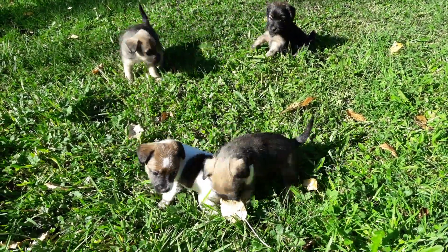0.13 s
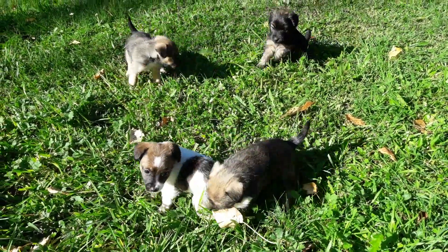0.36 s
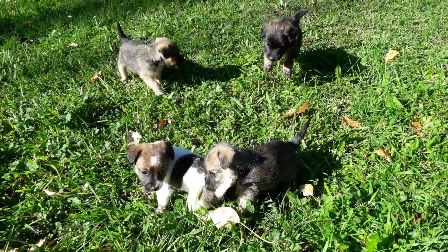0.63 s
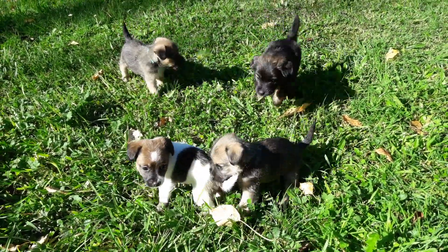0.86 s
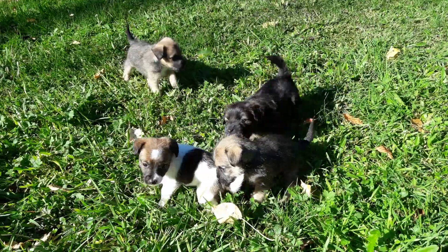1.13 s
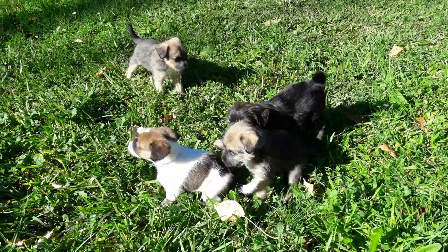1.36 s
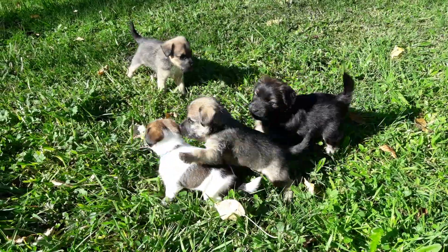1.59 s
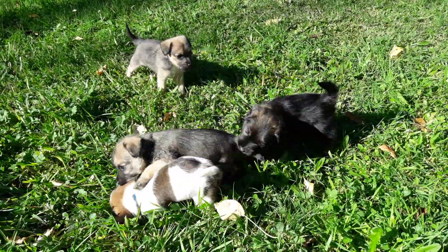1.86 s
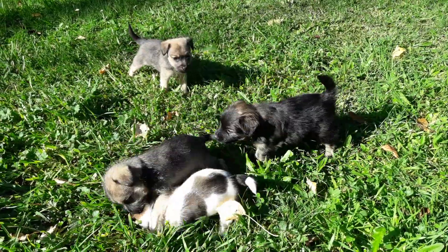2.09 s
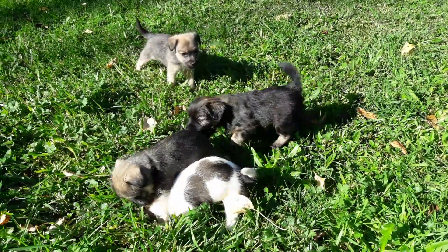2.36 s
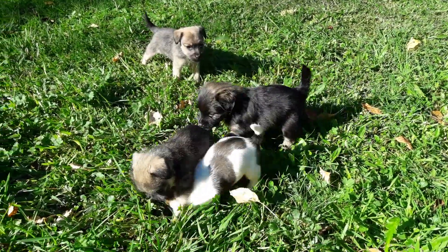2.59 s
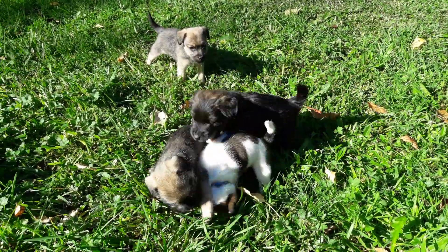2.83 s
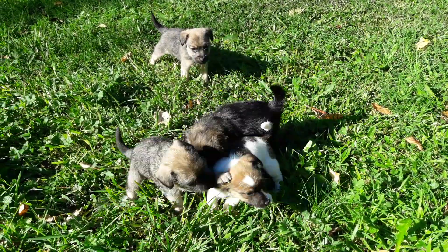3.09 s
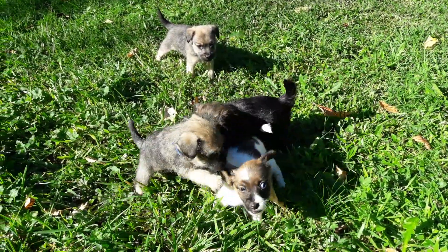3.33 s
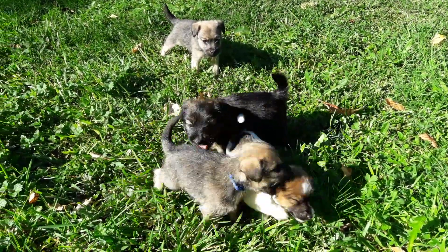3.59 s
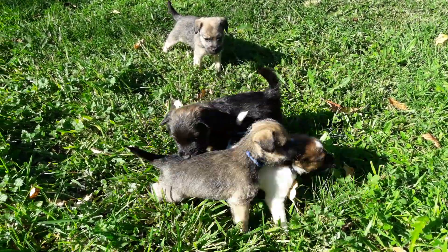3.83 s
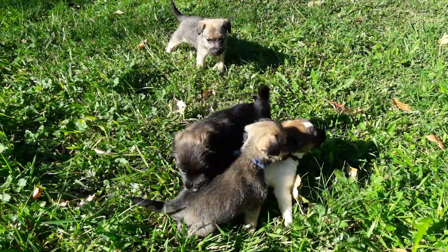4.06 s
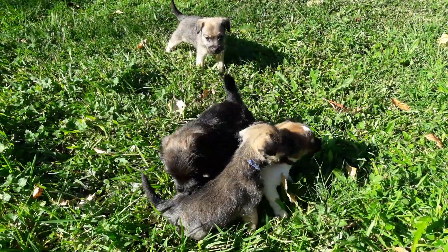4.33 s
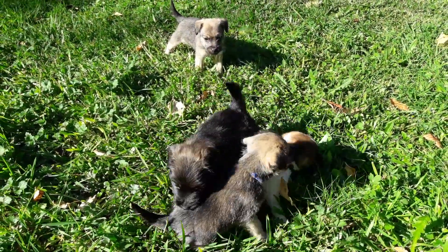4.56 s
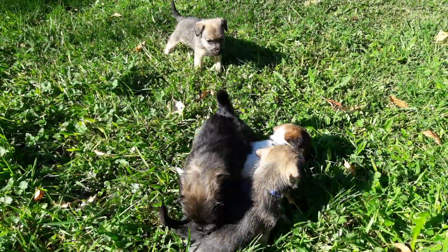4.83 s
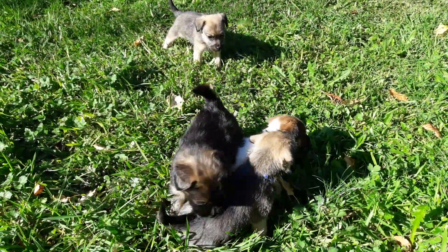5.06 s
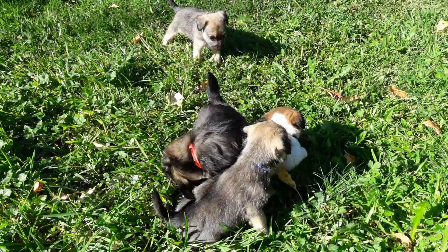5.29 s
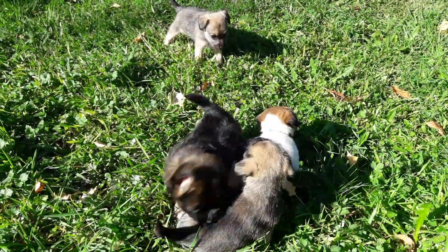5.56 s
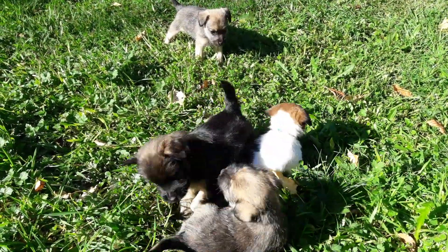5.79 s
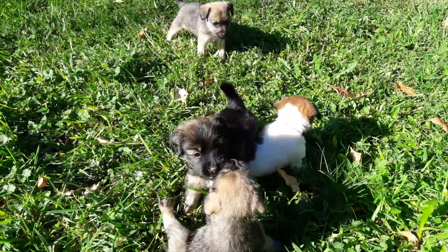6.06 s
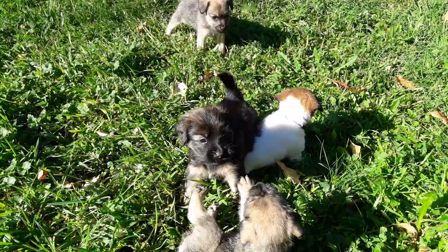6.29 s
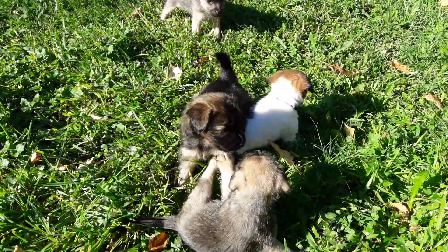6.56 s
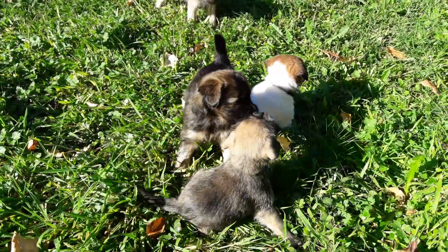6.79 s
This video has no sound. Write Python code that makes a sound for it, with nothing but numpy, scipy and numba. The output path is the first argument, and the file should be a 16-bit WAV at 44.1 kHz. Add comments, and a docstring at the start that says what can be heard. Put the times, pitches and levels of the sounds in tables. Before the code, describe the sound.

Small puppies wrestle on grass close to the microphone. Quiet hiss and sparse ticks come first, then paws scuff crisply through blades and dry leaves. A short throbbing growl sounds after two seconds, tiny faint grunts follow, a weak low growl comes past four, and two louder hoarse growls come near six. A faint sniff ends it. A low breeze rumbles beneath, almost centred.

```python
"""On a lawn, puppies wrestle a step away: hoarse throbbing play-growls, short grunts and a faint late sniff.
Each voice is a clear fundamental plus rough puffs and breath ringing three resonances of throat and mouth.
Paws and fur crackle through grass and dry leaves as filtered bursts of clicks, and single stalks snap
as tiny rings inside crunching noise. Behind lie an even microphone hiss and the low rumble of a breeze."""
import sys
import numpy as np
from scipy import signal
from scipy.fft import rfft, irfft
from scipy.io import wavfile
from scipy.ndimage import uniform_filter1d
from numba import njit

SR = 44100
rng = np.random.default_rng(int(sys.argv[2]) if len(sys.argv) > 2 else 0)


def generate_wav(sig):
    """Save sig (samples, or channels by samples) to the path in sys.argv[1] as 16-bit PCM at SR."""
    pcm = np.round(np.clip(np.atleast_2d(sig).T, -1, 1) * 32767).astype(np.int16)
    wavfile.write(sys.argv[1], SR, pcm)


def invert_db(level):
    """Linear amplitude ratio for a level in decibels (20 dB per decade), elementwise."""
    return 10 ** (np.asarray(level, dtype=float) / 20)


N = 304936
TIME = np.arange(N) / SR


def unit(x):
    """Scale to rms 1."""
    return x / np.sqrt(np.mean(x ** 2))


def shape(x, points):
    """Filter by (Hz, dB) points; 120 dB down outside them."""
    hz, db = np.transpose(points)
    f = np.maximum(np.arange(len(x) // 2 + 1) * SR / len(x), 1)
    gain_db = np.interp(np.log(f), np.log(hz), db, -120, -120)
    return irfft(rfft(x) * invert_db(gain_db), len(x))


def walk(rate, size=N):
    """Smooth chance that changes about rate times a second, spread 1."""
    k = max(int(SR / rate), 1)
    smooth = uniform_filter1d(rng.standard_normal(size), k)
    return unit(uniform_filter1d(smooth, k))


def swell(s, db, rise_s, fall_s):
    """Power of an event that grows to its peak at s and dies away."""
    before = (s - TIME) / max(rise_s, 1e-3)
    after = (TIME - s) / max(fall_s, 1e-3)
    return invert_db(db) ** 2 * np.exp(-2 * np.maximum(before, after))


@njit
def svf(x, hz, width):
    """State-variable band-pass whose centre can move; gain 1 at the centre."""
    y, b, l = np.empty(len(x)), 0., 0.
    for i in range(len(x)):
        g, k = np.tan(np.pi * hz[i] / SR), width / hz[i]
        v = (b + g * (x[i] - l)) / (1 + g * (g + k))
        b, l, y[i] = 2 * v - b, l + 2 * g * v, k * v
    return y


def choke(t, flaps, width_s):
    """Depth in dB of the throat flaps over time: one smooth bump a flap."""
    return sum(db * np.exp(-((t - s) / width_s) ** 2) for s, db in zip(*flaps))


# a side pocket swallows a band just under the upper resonance and moves with it
POCKET_RATIO, POCKET_WIDTH_HZ = 0.766, 120


def voice(t, flaps, hz, low_db, throat_db, mouth_db, upper_db, upper_hz,
          throat_hz, mouth_hz, mouth_width_hz, slide, hoarse):
    """A clear fundamental; uneven puffs of the vocal folds and their air ring three resonances."""
    size = len(t)
    dip_db = choke(t, flaps, 0.0064)
    # the pitch slides down between flaps, sags around each and trembles from cycle to cycle
    flap_count = np.interp(t, flaps[0], np.arange(len(flaps[0])))
    between = uniform_filter1d(flap_count % 1, size=400)
    sag = 1 - invert_db(-choke(t + 0.00096, flaps, .011))
    tremble = 0.048 * hoarse * walk(295, size=size)
    hz = hz * (1.06 - 0.2 * sag - slide * (between - .5) + tremble)
    phase = 2 * np.pi * np.cumsum(hz) / SR
    fundamental_db = low_db + 2.5 - dip_db + 6 * hoarse * walk(123, size=size)
    out = -np.sqrt(2) * invert_db(fundamental_db) * np.sin(phase)

    harmonics = sum(np.cos(k * phase) for k in range(2, 14))
    puffs = harmonics * invert_db(5 * hoarse * walk(260, size=size))
    breath = rng.standard_normal(size) * (1 + .5 * np.cos(phase))
    source = unit(puffs) + 2.4 * hoarse * unit(breath)
    # level, centre, width, edge above which side pockets of the throat swallow the sound
    resonances = ((throat_db - 0.024 * dip_db, throat_hz, 360, 1100),
                  (mouth_db - 0.025 * dip_db, mouth_hz, mouth_width_hz, 1550),
                  (upper_db - 0.1 * dip_db, upper_hz, 680, 2300))
    for db, centre_hz, width_hz, top_hz in resonances:
        ring = signal.sosfilt(signal.butter(12, top_hz, fs=SR, output="sos"), source)
        for _ in range(3):  # steep flanks leave dark valleys between the resonances
            ring = svf(ring, centre_hz + 0 * t, 1. * width_hz)
        out -= invert_db(db) * unit(ring)
    return out - svf(out, POCKET_RATIO * upper_hz + 0 * t, 1. * POCKET_WIDTH_HZ)


# The growls, one list a call. Each row: time in seconds, base pitch in Hz, effort in dB,
# mouth opening from 0 to 1.
CALLS = [
    [(2.228, 289.2, -61.5, 0.44), (2.311, 283, -40.5, 0.36), (2.399, 240.5, -45, 0.36),
     (2.468, 225.3, -56, 0.23), (2.5, 221, -78.5, 0.22)],
    [(4.185, 250, -66, 0.43), (4.239, 248.4, -54.5, 0.44), (4.459, 198.8, -65.5, 0.26),
     (4.509, 186.8, -72, 0.02), (4.53, 190, -72, .1)],
    [(5.445, 294.4, -62, 0.17), (5.529, 272.5, -49.5, 0.08), (5.649, 337.4, -38.5, 0.61),
     (5.715, 286.5, -41, 0.63), (5.787, 309, -41.5, 0.76), (5.839, 292.5, -43.5, .1),
     (5.856, 276, -71.5, 0.67)],
    [(6.125, 330.4, -55, 0.64), (6.165, 343.6, -35, 0.09), (6.249, 289, -46.5, 0.87),
     (6.359, 300.2, -45.5, 0.9), (6.417, 271, -47, 0.91), (6.485, 265.1, -50, 0.49),
     (6.611, 272.6, -49.5, 0.04), (6.651, 256, -51, .05), (6.69, 258, -65, 0)],
]
# The caller's throat and mouth. Each row: throat resonance in Hz, mouth resonance in Hz, mouth width in Hz,
# pitch slide from flap to flap as a share.
CALLER_THROATS = [(604, 829, 380, 0.1463), (370.4, 886, 367, 0.2), (643, 896, 660, 0.035),
                  (576, 800, 640, 0.031)]
# How rough each caller sounds. Each entry: share of disorder, 0 to 1.
CALLER_HOARSENESS = [.75, .45, .52, .52]
# How each caller's sound is divided, against its effort. Each row: base level of the fundamental in dB,
# effort up to which it stays relaxed in dB, mouth level when shut in dB, mouth gain when wide open in dB,
# upper resonance level when shut in dB.
CALLER_BALANCES = [(-19, -43, -3.5, 2, -42), (2.5, -56, -5, 8, -18.5), (6, -50.5, -1.3, -1.5, -15.5),
                   (2, -46.5, -1, 5, -14.5)]
# The upper resonance arches through a call. Each row: start in Hz, middle in Hz, end in Hz.
UPPER_ARCHES = [(2000, 2100, 1900), (1680, 1830, 1950), (2340, 1990, 2330), (1650, 2094, 1950)]
# A slack fold in the throat flaps and briefly chokes the voice. Each row: nominal first flap in seconds,
# period in seconds, depth in dB before easing and scatter.
THROAT_FLAPS = [(2.265, 0.038, 16), (4.222, .0372, 20), (5.505, .0415, 14), (6.143, 0.042, 14.5)]
FLAP_JITTER_S, FLAP_SCATTER_DB = 0.0031, 3
FLAP_EASE = .45  # share of the depth lost with the mouth wide open
OPEN_UPPER_DB = 14.5  # gain of the upper resonance from shut to wide open
STRAIN = 1.22  # dB that the fundamental loses for each dB of effort above the relaxed one
VOICING_S, VOICING_DB = 0.059, 20  # a call starts breathy: the fundamental climbs by so much in this time


def growls():
    """Effort and mouth opening set the parts of a growl, while a flapping fold makes it throb."""
    out = np.zeros(N)
    callers = zip(CALLS, CALLER_THROATS, CALLER_HOARSENESS, CALLER_BALANCES, UPPER_ARCHES, THROAT_FLAPS)
    for call, throat, hoarse, balance, arch, (first, period, depth_db) in callers:
        s, *columns = np.transpose(call)
        on = (TIME > s[0]) & (TIME < s[-1])
        t = TIME[on]
        hz, effort_db, opening = (np.interp(t, s, c) for c in columns)
        low_db, relaxed_db, mouth_db, wide_db, upper_db = balance

        chance = rng.standard_normal(size=(20, 2))
        when = first + period * (np.arange(20) - 2) + FLAP_JITTER_S * chance[:, 0]
        eased_db = depth_db * (1 - FLAP_EASE * np.interp(when, t, opening))
        depth = np.maximum(eased_db + FLAP_SCATTER_DB * chance[:, 1], 0)
        flaps = when, depth * (when > first - period / 2)  # none before the first

        part = np.linspace(-1, 1, len(t))
        end_hz = np.where(part < 0, arch[0], arch[2])
        upper_hz = arch[1] + (end_hz - arch[1]) * part ** 2
        strain_db = STRAIN * np.maximum(effort_db - relaxed_db, 0)
        breathy_db = VOICING_DB * np.maximum(1 - (t - s[0]) / VOICING_S, 0)
        low_db = effort_db + low_db - strain_db - breathy_db
        mouth_db = effort_db + mouth_db + wide_db * opening
        upper_db = effort_db + upper_db + OPEN_UPPER_DB * opening
        edge = np.clip(np.minimum(t - s[0], s[-1] - t) / 0.0019, 0, 1)
        out[on] += edge * voice(t, flaps, hz, low_db, effort_db, mouth_db, upper_db, upper_hz,
                                *throat, hoarse)
    return out


# The short grunts. Each row: start in seconds, length in seconds, base pitch in Hz,
# base level of the fundamental in dB, base level of the resonances in dB.
SHORT_GRUNTS = [(2.724, 0.042, 256, -74.5, -73), (3.095, 0.0402, 219, -66.5, -86),
                (3.182, 0.031, 238.6, -68.5, -78), (5.938, 0.031, 363.5, -68, -59.5)]
GRUNT_BRIGHT_DB_PER_HZ = .17  # higher grunts carry more of the upper resonance


def grunts():
    """The same kind of voice swells and dies within a few hundredths of a second as its pitch falls."""
    out = np.zeros(N)
    for s, length, hz, low_db, db in SHORT_GRUNTS:
        on = (TIME > s) & (TIME < s + length)
        part = (TIME[on] - s) / length
        upper_db = db - GRUNT_BRIGHT_DB_PER_HZ * (365 - hz)
        falling_hz = hz * (1 - 0.147 * part)
        no_flaps = ([0], [0])
        sound = voice(TIME[on], no_flaps, falling_hz, low_db, db, db, upper_db, upper_hz=2426,
                      throat_hz=625, mouth_hz=800, mouth_width_hz=440, slide=0, hoarse=0.46)
        out[on] += np.sin(np.pi * part) ** 0.16 * sound
    return out


def crackle(per_s, spread_db, smooth):
    """Clicks of unequal size, smeared into short bursts of noise, over an even hiss."""
    size_db = spread_db * np.minimum(rng.exponential(size=N), 4)
    clicks = (rng.random(N) < per_s / SR) * invert_db(size_db)
    burst = signal.lfilter([1], [1, -np.exp(-1 / (SR * 0.0013))], clicks)
    hiss = rng.standard_normal(N)
    return unit(hiss * (smooth + unit(burst))) * invert_db(1.23 * walk(26))


# The colour of the grass blades. Each row: frequency in Hz, relative level in dB.
BLADE_COLOUR = [(4700, -35.5), (5600, -13.5), (6500, -3), (8000, 2), (8900, 4), (9600, -0.5),
                (10800, -13.5), (12000, -28)]
# The colour of the dry leaves. Each row: frequency in Hz, relative level in dB.
LEAF_COLOUR = [(700, -21), (1500, -13), (1850, -4.5), (2300, -9.5), (3400, -8.5), (3900, -3), (4500, -3),
               (5400, -1), (6500, -1.5)]
# How busily the puppies shuffle in the grass. Each row: time in seconds, level of the blades in dB.
SHUFFLING = [(0.0, -70), (.75, -84), (1.3, -59.5), (1.55, -68.5), (1.9, -56.5), (2.6, -63.5), (2.8, -56.5),
             (3.48, -60), (3.6, -55.5), (4.18, -54.5), (5.12, -57.5), (5.5, -52), (5.9, -56), (6.45, -54),
             (6.74, -61.5), (6.91, -60.5)]
SHUFFLE_LEAF_DB, SHUFFLE_TOP_DB = -19, -34.5  # shares of dry leaves and of the fine top
# Paws and bodies scuff through it. Each row: peak in seconds, peak level of the blades in dB,
# fall time in seconds, dry-leaf share in dB, fine top share in dB.
PAW_SCUFFS = [(0.785, -56, 0.05, -22, -35), (.955, -60, 0.018, -23.5, -20),
              (1.03, -55.5, 0.041, -20, -22.5), (1.157, -48.5, 0.0525, -14, -28),
              (1.208, -46, 0.025, -7.5, -21.5), (1.439, -52.5, .05, -11, -38.5), (1.9, -52, 0.1, -18, -23),
              (2.119, -45.5, 0.031, -21, -32), (2.377, -53.5, 0.18, -16, -26),
              (2.686, -50, 0.049, -20, -32), (2.867, -53.5, 0.2, -23.5, -20), (3.142, -47, 0.062, -24, -28),
              (3.313, -54, 0.062, -26, -31.5), (3.565, -51, 0.082, -20.5, -23),
              (3.68, -50.5, 0.092, -18, -20.5), (3.85, -51, .05, -20, -24), (3.968, -51, 0.058, -19, -29),
              (4.042, -52, 0.045, -15.5, -18), (5.693, -51, 0.14, -16, -20), (5.957, -63, 0.0477, 1.5, -33),
              (6.314, -52, 0.15, -17, -19)]
SCUFF_RISE = 0.46  # rise time as a share of the fall time


def grass():
    """Blades give the bright band, dry leaves the lower one; all share the same contacts."""
    shuffle = invert_db(np.interp(TIME, *np.transpose(SHUFFLING))) ** 2
    power = shuffle * invert_db(np.array([[0], [SHUFFLE_LEAF_DB], [SHUFFLE_TOP_DB]])) ** 2
    for s, db, fall_s, leaf_db, top_db in PAW_SCUFFS:
        shares = invert_db(np.array([[0], [leaf_db], [top_db]])) ** 2
        power = power + swell(s, db, SCUFF_RISE * fall_s, fall_s) * shares
    contact = crackle(per_s=800, spread_db=5.5, smooth=2.06)
    blades = unit(shape(contact, BLADE_COLOUR))
    leaves = unit(shape(contact, LEAF_COLOUR))
    top_colour = [(11000, -8), (12500, -12), (13500, 2), (14900, -7), (15800, 2.5), (16500, -38)]
    top = unit(shape(contact, top_colour))
    return np.sum(np.sqrt(power) * [blades, leaves, top], axis=0)


# Stalks and leaves snapping. Each row: time in seconds, level in dB before a 9 dB cut and the final
# filter, ring in Hz.
STALK_SNAPS = [(0.2867, -40, 9100), (0.7805, -31.5, 8140), (0.9484, -37, 7700), (1.012, -35, 8000),
               (1.04, -34, 7760), (1.1575, -26.5, 7600), (1.2264, -27.5, 8340), (1.427, -30, 7740),
               (1.4754, -36, 8600), (1.757, -31.5, 8950), (1.878, -30.5, 8900), (1.946, -34, 8580),
               (2.459, -28, 7680), (2.4942, -31, 5500), (2.655, -29, 8200), (3.1188, -36, 9020),
               (3.1423, -27.5, 9260), (3.3053, -30.5, 8450), (3.651, -26, 7200), (3.7241, -19.5, 9820),
               (3.761, -30.5, 7970), (3.8371, -26.5, 9280), (3.8474, -36, 8600), (3.8544, -35, 9290),
               (3.9647, -30, 8300), (4.0144, -30, 8600), (4.0592, -28, 6800), (4.3817, -33, 8400),
               (5.625, -29, 6700), (5.958, -28.5, 5900), (5.989, -35.5, 8810), (6.4861, -31.5, 9060),
               (6.782, -33, 4780)]
CRUNCH_DB = -13  # crunch under each tick


def snaps():
    """A tick that rings under a millisecond, inside a crunch that swells quickly and dies in about 10 ms."""
    out = np.zeros(N + 2000)
    t = np.arange(2000) / SR - .005
    after = np.maximum(t, 0)
    noises = rng.standard_normal((len(STALK_SNAPS), 2000))
    for (s, db, hz), noise in zip(STALK_SNAPS, noises):
        tick = (t >= 0) * np.sin(2 * np.pi * hz * t) * np.exp(-after / 0.00071)
        crunch = noise * np.exp(np.minimum(t, 0) / 0.0013 - after / 0.0084)
        start = int((s + t[0]) * SR)
        out[start:start + 2000] += invert_db(db - 9.0) * (tick + invert_db(CRUNCH_DB) * crunch)
    return shape(out[:N], [(1200, -25), (3500, -14.5), (6500, 1.0), (9000, 7.0), (12000, -11.5), (16000, -17)])


SNIFF_S, SNIFF_DB = 6.785, -69  # where the steep onset gives way to a slow swell, and the level there
SNIFF_ATTACK_S, SNIFF_SWELL_DB_PER_S = .021, 17  # time for 25 dB of onset; swell until the end


def sniff():
    """Air whistling faintly through narrow nostrils: a narrow band of noise."""
    since = TIME - SNIFF_S
    db = SNIFF_DB + np.minimum(25 * since / SNIFF_ATTACK_S, SNIFF_SWELL_DB_PER_S * since)
    whistle = shape(rng.standard_normal(N), [(4000, -38), (4700, 7.5), (5000, 7), (5400, 1.0), (6000, -40)])
    return invert_db(db + 2 * walk(90)) * unit(whistle)


# The colour of the microphone hiss. Each row: frequency in Hz, relative level in dB.
HISS_COLOUR = [(20, -19), (60, -6.5), (105, 3), (220, -7.5), (700, -12), (2200, -14.5), (3700, -17.5),
               (5900, -17), (7300, -5.5), (8800, -1), (9600, -7), (11000, -24.5), (16000, -26)]
HISS_DB = -64
BREEZE_START_DB, BREEZE_RISE_DB_PER_S = -87.5, 1.43
# Gusts of the breeze. Each row: peak in seconds, peak level in dB before random wavering,
# rise and fall time in seconds.
BREEZE_GUSTS = [(3.05, -80, .25), (4.425, -69.5, 0.15), (4.795, -63, 0.08), (6.199, -70, 0.32),
                (6.628, -60.5, 0.086)]


def air():
    """Even hiss of the microphone and a breeze that rumbles low."""
    steady = invert_db(BREEZE_START_DB + BREEZE_RISE_DB_PER_S * TIME) ** 2
    breeze = steady + sum(swell(s, db, length, length) for s, db, length in BREEZE_GUSTS)
    low_colour = [(30, -18), (60, -2.5), (110, -4.5), (200, -12.0), (350, -17)]
    rumble = unit(shape(rng.standard_normal(N), low_colour))
    hiss = unit(shape(rng.standard_normal(N), HISS_COLOUR))
    return invert_db(HISS_DB) * hiss + np.sqrt(breeze) * invert_db(4.7 * walk(15)) * rumble


# How the air differs between the ears. Each row: frequency in Hz, side gain in dB.
SIDE_SPREAD = [(25, -18), (60, -26.5), (300, -18.5), (4400, -16), (8500, -32.5), (11000, -7.5),
               (15000, 4.5)]


def scene():
    """Both channels carry nearly the same sound; only a trace of the hiss and breeze differs."""
    mid = growls() + grunts() + grass() + snaps() + sniff() + air()
    side = shape(air(), SIDE_SPREAD)
    return np.array([mid + side, mid - side])


def low_pass(x):
    """Removes everything above the highest recorded frequency."""
    return signal.sosfilt(signal.butter(12, 16470, fs=SR, output="sos"), x)


def record(dry):
    """Turn the finished mix into the sound that is heard."""
    return low_pass(dry)


dry = scene()
out = record(dry)
generate_wav(out)
```